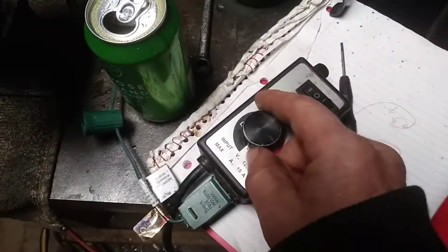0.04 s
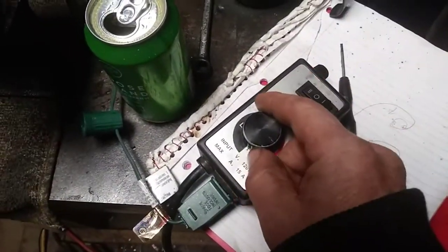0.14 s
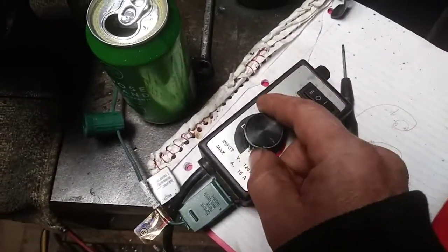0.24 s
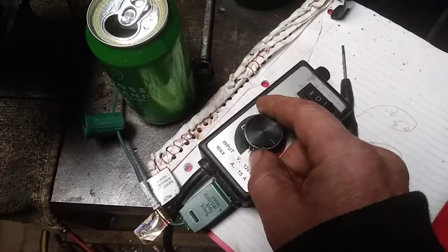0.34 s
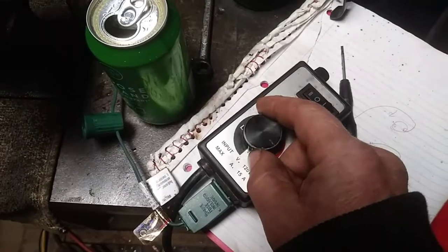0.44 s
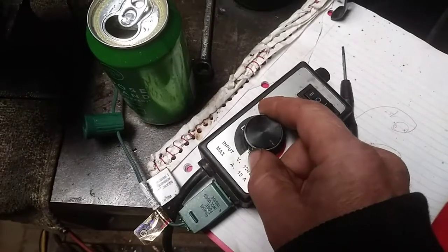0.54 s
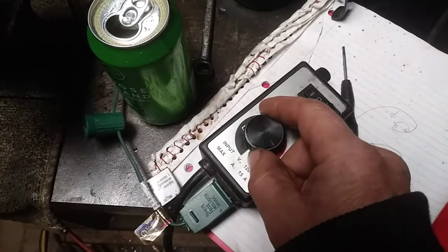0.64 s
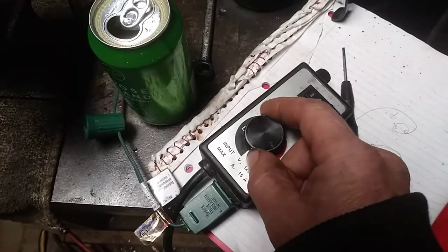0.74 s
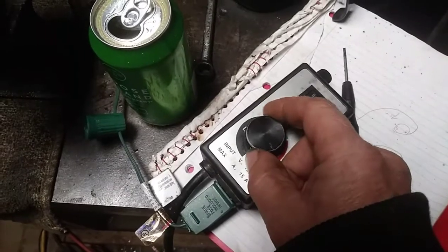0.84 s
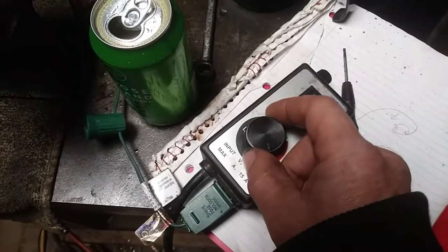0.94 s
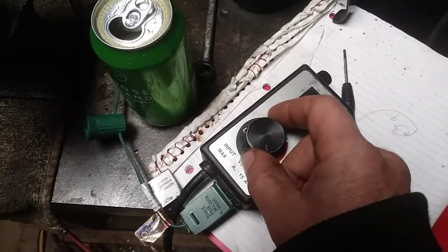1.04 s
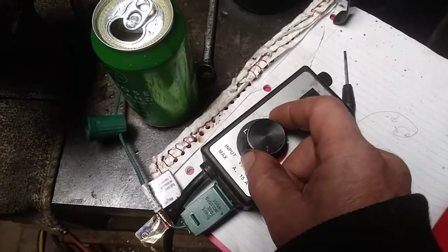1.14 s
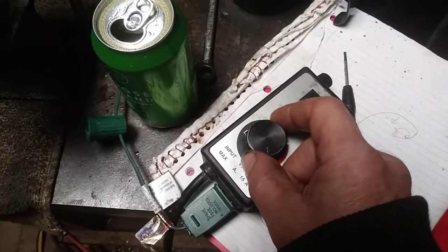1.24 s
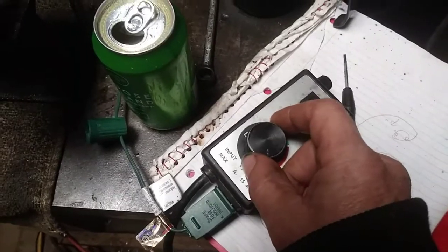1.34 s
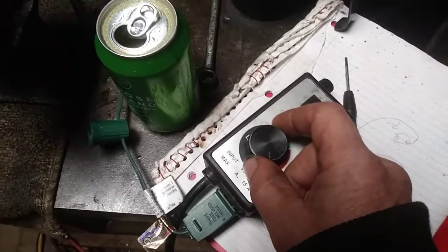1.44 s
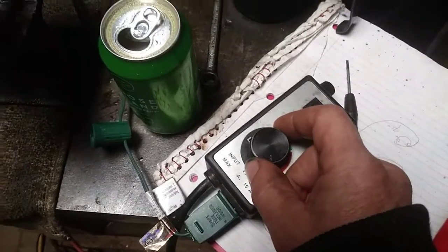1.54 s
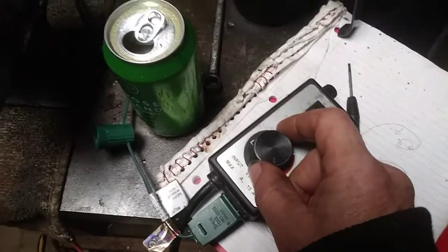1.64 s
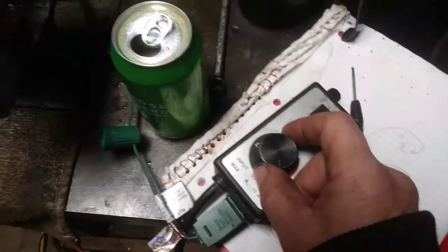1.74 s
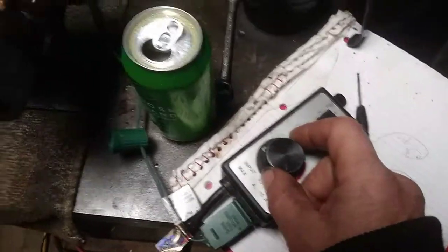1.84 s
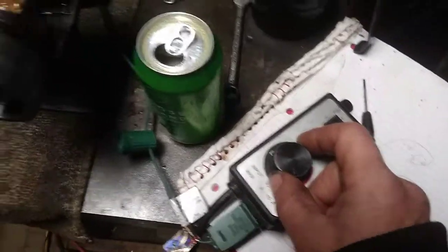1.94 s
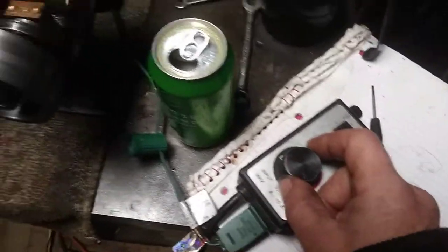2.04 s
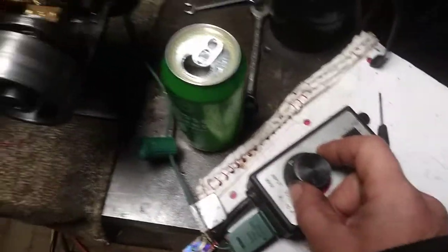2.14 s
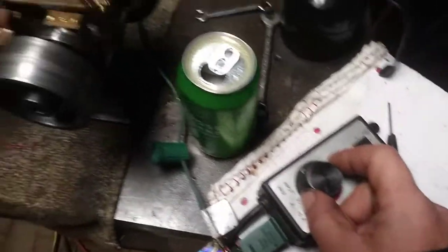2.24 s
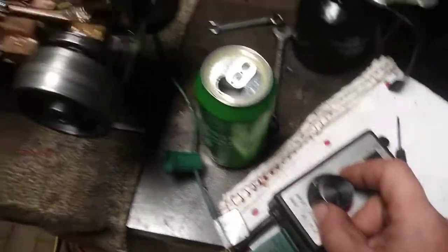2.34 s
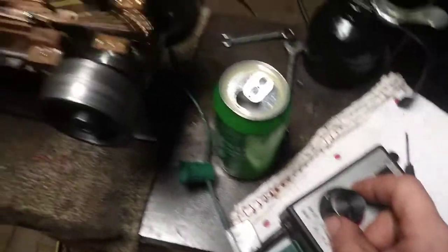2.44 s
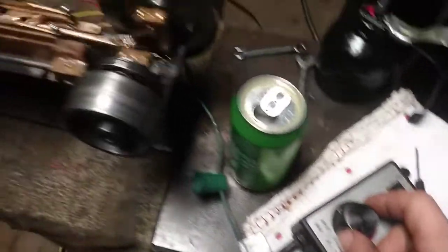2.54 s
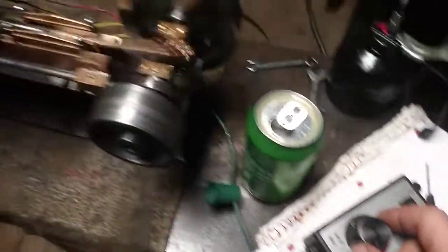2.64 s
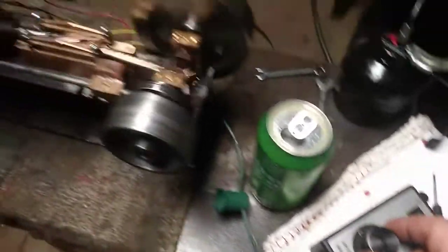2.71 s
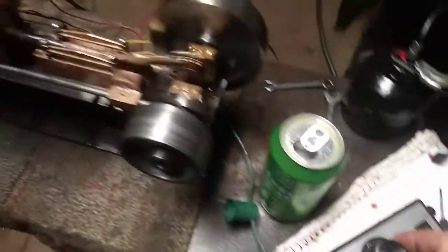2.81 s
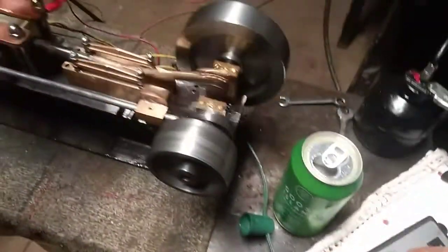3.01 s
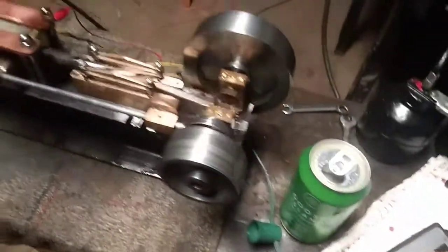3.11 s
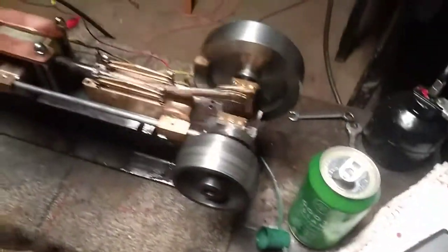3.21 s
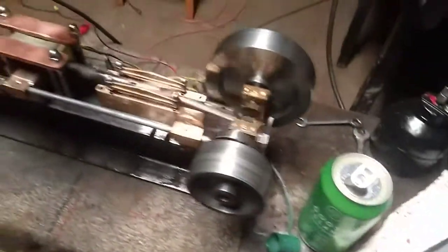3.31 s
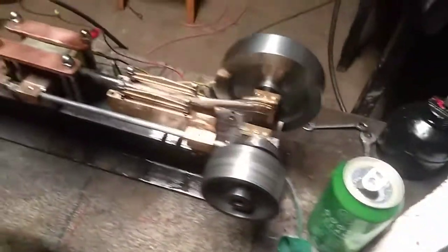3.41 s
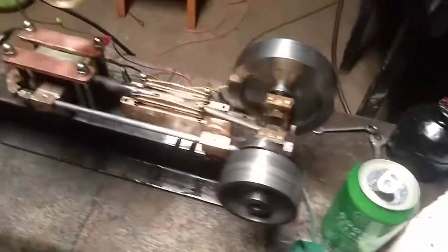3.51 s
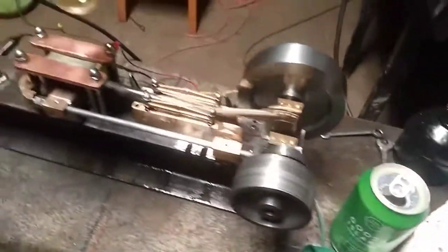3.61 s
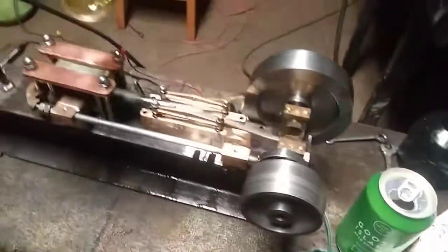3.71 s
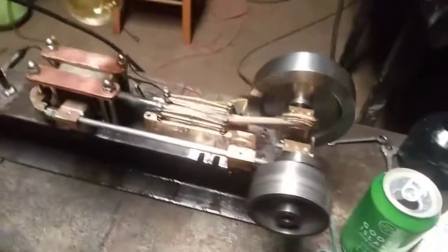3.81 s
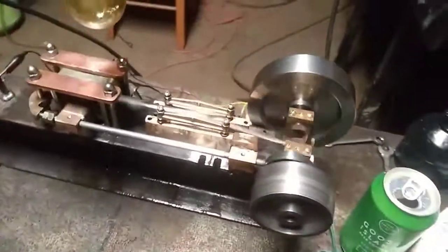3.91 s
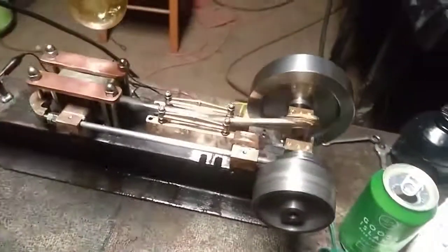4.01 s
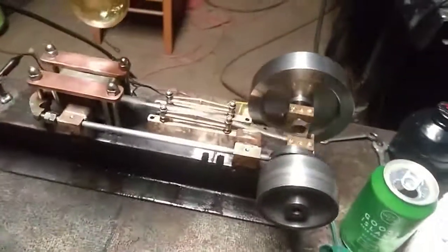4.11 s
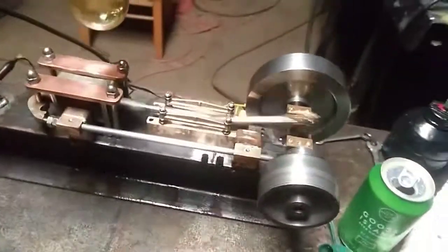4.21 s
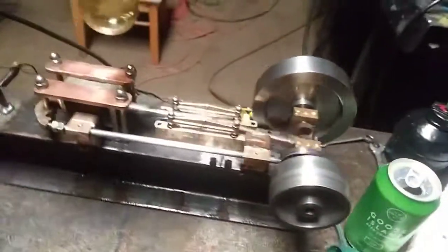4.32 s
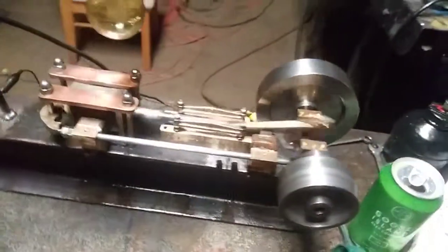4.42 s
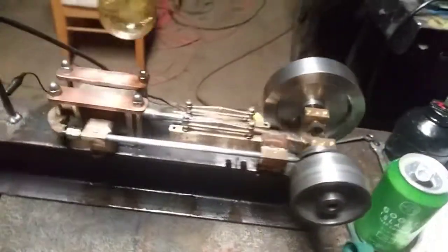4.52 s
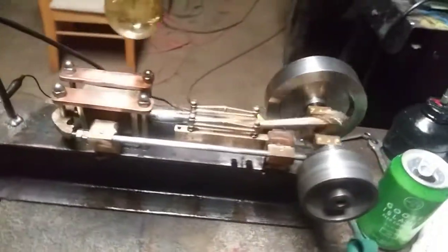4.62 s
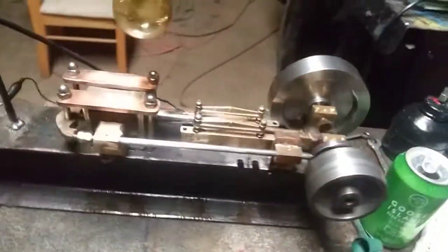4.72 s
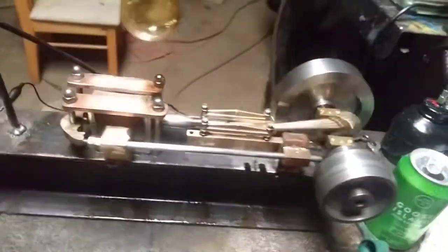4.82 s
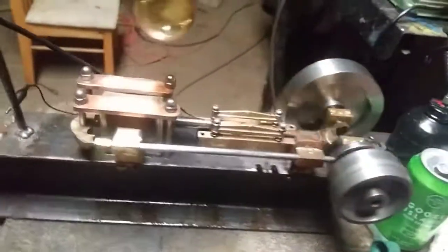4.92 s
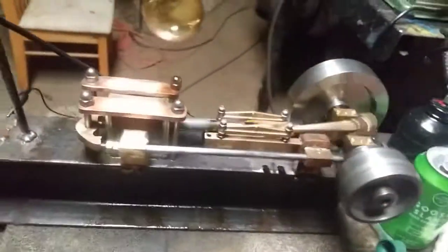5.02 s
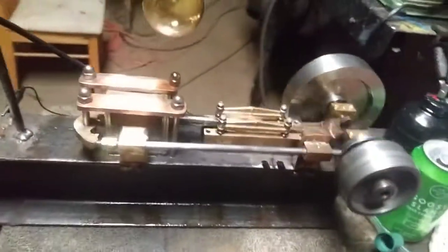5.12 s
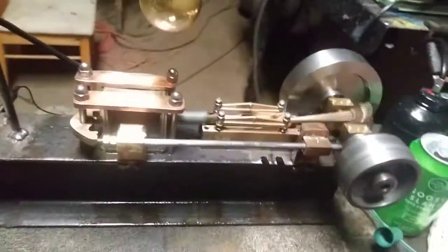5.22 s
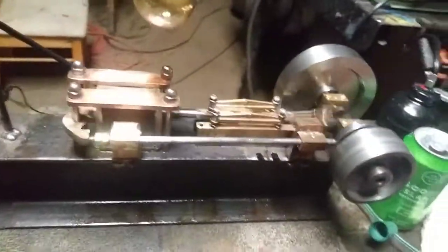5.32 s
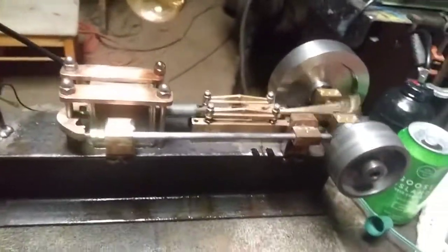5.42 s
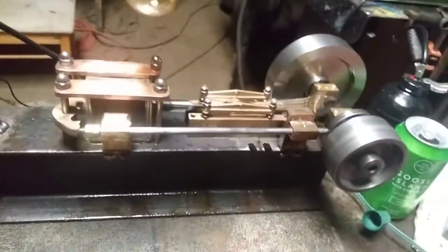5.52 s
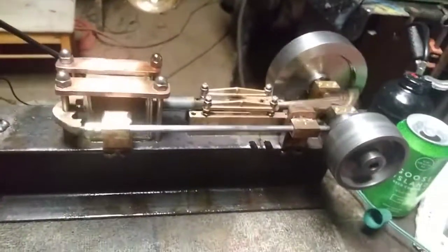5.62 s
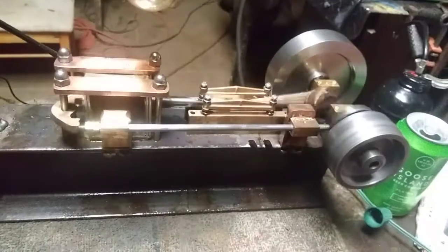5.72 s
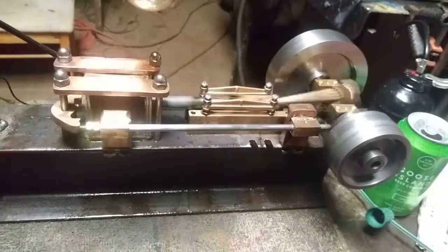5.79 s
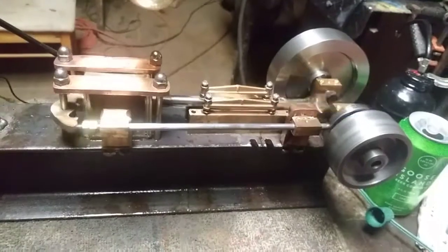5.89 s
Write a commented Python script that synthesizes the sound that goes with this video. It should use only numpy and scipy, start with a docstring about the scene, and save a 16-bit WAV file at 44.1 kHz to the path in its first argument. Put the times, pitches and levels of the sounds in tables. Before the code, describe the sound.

Steady bright metallic clacks, each with a light tick before and a duller rebound after, gradually speed up over faint hiss in a small workshop.

```python
"""On a workshop bench a small solenoid engine of steel and copper runs and gathers speed. Each turn gives a tick
as the linkage takes up its play, a bright clack as the plunger lands and a duller rebound. These contacts are
pushes and noise bursts through the resonances of one frame; a base, a thin rod and a link add their own notes.
A hand scuffs twice nearby in grainy noise, the workshop answers with decaying noise tails, and a low coloured
hiss lies beneath. One microphone gives both channels the same sound."""
import sys
import numpy as np
from scipy import signal
from scipy.fft import rfft, irfft, next_fast_len
from scipy.io import wavfile
from scipy.ndimage import uniform_filter1d

SR = 44100
rng = np.random.default_rng(int(sys.argv[2]) if len(sys.argv) > 2 else 0)


def unload_audio(sound):
    """Save the sound as a 16-bit wav file, at the path given as the first command line argument."""
    columns = np.transpose(np.atleast_2d(sound))
    # keep every value between -1 and 1, then stretch to whole-number steps
    steps = np.round(np.clip(columns, -1, 1) * 32767)
    wavfile.write(sys.argv[1], SR, steps.astype(np.int16))


N = 262395
LEAD = SR // 10  # samples played before the start, so that earlier blows still ring

EARLIER_S = -0.018  # a landing just before the start
# turns of the engine, the first landing just before the start; levels before each layer's own gain:
# (landing t/s, landing level/dB, rebound level/dB, rod ring re landing/dB, brightness re landing/dB)
TURNS = [(EARLIER_S, -31, -32, -28, 2), (0.2224, -33.5, -29, -30, 3.5), (0.4633, -31.5, -50, -30, 2.5),
         (0.7058, -29.5, -27, -20, 3), (0.9429, -29.5, -34, -23, 0.5), (1.1738, -29, -28, -27, 3),
         (1.3984, -30.5, -26.5, -27, 4.5), (1.619, -30.5, -36.5, -33, 2.5), (1.836, -26, -43, -32, -1.5),
         (2.0511, -26, -31, -24, 1.5), (2.2627, -27, -29, -35, 3.5), (2.472, -25, -22.5, -27, 2.5),
         (2.6787, -24.5, -45, -25, 5), (2.8846, -24.5, -35.5, -33, 1.5), (3.0874, -25.5, -29.5, -25, 2),
         (3.2901, -24.5, -23, -28, 2.5), (3.4905, -23, -23, -24, 0.5), (3.69, -23.5, -23, -27, 2),
         (3.8888, -22.5, -22, -36, -2), (4.0855, -22.5, -37, -35, -0.5), (4.2827, -23, -22.5, -32, 1),
         (4.4785, -23, -47.5, -28, -1), (4.6728, -23, -22.5, -35, -1.5), (4.8668, -21, -28.5, -27, -2),
         (5.0605, -21, -35, -31, -1), (5.2535, -22, -49, -19.5, -2), (5.446, -22.5, -41, -19, -4),
         (5.6372, -24, -50, -22.5, 0), (5.8285, -22.5, -38, -28, 2.5)]
# bright resonances of a hard contact: (f/Hz, width/Hz, relative level/dB)
SNAP = [(7480, 3600, -22.5), (10100, 3600, -7.5), (11250, 370, -1.5), (13020, 1200, 0), (15500, 2300, -6.5)]


def amp(db):
    """Gain of a level in dB."""
    return 10 ** (np.asarray(db) / 20)


def unit(x):
    """x at rms 1."""
    return x / np.sqrt(np.mean(x ** 2) + 1e-20)


def along(points, hz):
    """Values at hz, read from (f/Hz, value) points on a log frequency axis."""
    f, v = np.transpose(points)
    return np.interp(np.log(hz + 1), np.log(f + 1), v)


def filtered(x, response):
    """x times a complex response of frequency, padded so that rings do not wrap round."""
    n = x.shape[-1]
    m = next_fast_len(n + SR // 2)
    hz = np.fft.rfftfreq(m, 1 / SR)
    return irfft(rfft(x, m) * response(hz), m)[..., :n]


def noise(spectrum):
    """Noise of rms 1 coloured by a (f/Hz, level/dB) curve."""
    white = rng.standard_normal(N)
    return unit(filtered(white, lambda hz: amp(along(spectrum, hz))))


def ringing(force, modes):
    """A force through parallel (f/Hz, width/Hz, level/dB) resonances of alternating sign."""
    def response(f):
        total = 0
        for k, (centre, width, db) in enumerate(modes):
            damping = 1j * f * width
            total = total + (-1) ** k * amp(db) * damping / (centre ** 2 - f ** 2 + damping)
        return total
    return filtered(force, response)


def soft(x, top_hz):
    """A yielding contact carries little treble: two gentle low-pass stages."""
    return filtered(x, lambda hz: 1 / (1 + 1j * hz / top_hz) ** 2)


def pushes(times, db):
    """One clean push for each contact; row 0 is heard directly, row 1 fills the room."""
    force = np.zeros((2, LEAD + N))
    force[:, LEAD + np.round(times * SR).astype(int)] = amp(db)
    return force


def blows(times, db, chatter_s, first_db, rise_s=1e-5):
    """A first touch, then micro-impacts that die 60 dB in chatter_s; the room's many paths average them to a push."""
    t = np.arange(SR // 20) / SR
    decay = amp(-60 * t / np.reshape(chatter_s, (-1, 1)))
    bursts = rng.standard_normal((len(times), len(t))) * decay
    bursts *= 1 - np.exp(-t / rise_s)
    bursts /= np.linalg.norm(bursts, axis=1, keepdims=True)
    force = pushes(times, db) * [[amp(first_db)], [1]]
    for s, level, burst in zip(times, db, bursts):
        spot = force[0, LEAD + round(s * SR):][:len(t)]
        spot += amp(level) * burst[:len(spot)]
    return force


def frame(axis):
    """The frame's resonances as one kind of contact drives them (column 2 tick, 3 clack, 4 rebound)."""
    # resonances of the frame: (f/Hz, width/Hz, tick level/dB, clack level/dB, rebound level/dB)
    frame_modes = [(315, 230, -22, -17.5, -18), (660, 219, -9.5, -10, -5.5), (1560, 346, 0, -7, -6),
                   (1950, 218, 6, -0.5, -2.5), (2192, 250, 4.5, 3, 2), (2614, 720, -4.5, -6.5, -2.5),
                   (3354, 440, -4, -5.5, -1.5), (3710, 180, 3.5, -1, -1.5), (4340, 550, -8.5, -1, -2),
                   (4914, 830, -9.5, -1, -18.5), (5960, 1230, -17.5, -6, 0)]
    return [(row[0], row[1], row[axis]) for row in frame_modes]


def base(times, db):
    """The blow reaches the heavy base through its mounts, so the note swells for a few ms."""
    # note of the steel base: (f/Hz, width/Hz)
    base_note = (1068.3, 101)
    through_mounts = ringing(pushes(times, db), [(base_note[0], 260, 0)])
    return ringing(through_mounts, [(*base_note, 0)])


def swing(times):
    """Levels at these times: the balance shifts as the microphone swings round to the engine."""
    # balance before each layer's own gain; all but the tick level are relative to their contact:
    # (t/s, tick level/dB, tick brightness/dB, base knock/dB, link slap/dB)
    balance = [(0.2, -37.5, -18, 1, -21), (1.5, -34.5, -20, 3.5, -22), (1.95, -33.5, -19, -2.5, -23),
               (2.65, -32.5, -21, 1, -19), (3.1, -26.5, -15, 0.5, -14), (3.8, -24, -15, -2.5, -15),
               (4.3, -21.5, -14.5, -3.5, -17), (5.1, -23, -13.5, -6, -21), (5.5, -21.5, -20, -2.5, -14),
               (5.85, -21, -23, -3.5, -14)]
    s, *cols = np.transpose(balance)
    return [np.interp(times, s, col) for col in cols]


def hiss():
    """A steady bed of coloured noise whose level drifts."""
    # colour of the hiss: (f/Hz, relative level per Hz/dB)
    hiss_colour = [(15, -56), (25, -12), (76, -27.5), (229, -5), (840, -5.5), (1040, -4), (1480, -11.5),
                   (2160, -10), (3720, -15.5), (7600, -25.5), (11000, -22), (13600, -22), (15800, -24),
                   (16100, -48)]
    # drift of the hiss: (t/s, rms level/dB)
    hiss_drift = [(0, -66.5), (2.8, -65), (3.9, -71), (5.95, -62)]
    level_db = np.interp(np.arange(N) / SR, *np.transpose(hiss_drift))
    return amp(level_db) * noise(hiss_colour)


def shop(x, count):
    """The room's tail, each frequency dying at its own speed; each stretch of time gets a freshly drawn noise tail."""
    # decay of the workshop: (f/Hz, time to fall 60 dB/s)
    shop_decay = [(300, 1), (1000, 0.34), (2500, 0.41), (6000, 0.26), (14000, 0.19)]
    wet = np.zeros(len(x) + SR)
    step = len(x) // count + 1
    for start in range(0, len(x), step):
        hz, t, grains = signal.stft(rng.standard_normal(SR // 2), SR, nperseg=256)
        clutter = amp(-60 * t / 0.027)  # short answer of things on the bench
        walls = amp(-9 - 60 * t / along(shop_decay, hz)[:, None])
        tail = signal.istft(grains * (clutter + walls), SR, nperseg=256)[1]
        answer = signal.fftconvolve(x[start:start + step], tail / np.linalg.norm(tail))
        wet[start + 100:][:len(answer)] += answer  # 100 samples of delay
    return wet[:len(x)]


def scuffs():
    """Brief grainy rubbing that swells, holds and fades."""
    # strokes of the hand: (full swell t/s, level/dB, rise/s, hold/s, fall/s), rise and fall by a factor e
    strokes = [(0.053, -46.5, .012, .008, 0.0075), (1.049, -53, 0.003, .016, 0.009)]
    # colour of the rubbing: (f/Hz, relative level per Hz/dB)
    rub_colour = [(180, -39), (300, -11.5), (2280, -4), (3030, -5), (5700, -9.5), (6740, -14),
                  (9880, -13.5), (16000, -26)]
    t = np.arange(N) / SR
    swell = np.zeros(N)
    for s, db, rise, hold, fall in strokes:
        slope = np.minimum((t - s) / rise, (s + hold - t) / fall)
        swell += amp(db) * np.exp(np.minimum(slope, 0))
    roughness = unit(uniform_filter1d(rng.standard_normal(N), size=40))
    grain = amp(2.8 * roughness)
    return swell * unit(grain * noise(rub_colour))


def rattle(count):
    """Loose parts touch a few more times at random while the frame settles."""
    s, db = np.transpose(TURNS)[:2, :, None]
    wait, size = rng.random((len(TURNS), 2, count)).transpose(1, 0, 2)
    after_s = .015 + .07 * wait
    level_db = db + 5 - 190 * after_s + 8 * size  # later touches are weaker
    touches = blows((s + after_s).ravel(), level_db.ravel(), 0.0091, first_db=-4.5)
    return soft(ringing(touches, frame(axis=4)), top_hz=4400)


def rebounds():
    """A soft second landing, which follows after a fixed time and a share of the turn."""
    s, _, db = np.transpose(TURNS)[:3]
    lag_s, lag_share = .016, .043
    s = s + lag_s + lag_share * np.gradient(s)
    body = ringing(blows(s, db + 21, 0.014, first_db=-7, rise_s=.0004), frame(axis=4))
    return soft(body, top_hz=3700) + base(s, db + 16.5)


def ticks():
    """Mostly the frame's middle modes: a faint noisy lead-in 4 ms early, the touch, the pin settling 9 ms later."""
    s = np.transpose(TURNS)[0] - .0263  # seconds ahead of the landing
    db, bright_db = swing(s)[:2]
    modes = frame(axis=2)
    lower, upper = modes[:6], modes[6:]
    first_db, lead_in_s, settle_s = 3, s - .004, s + .009
    body = ringing(blows(s + .0006, db + 15.7, 0.027, first_db), lower)
    touch = blows(s, db + 20.5, 0.029, first_db)
    settling = blows(settle_s, db + 4, 0.007, first_db=-1)
    lead_in = blows(lead_in_s, db + 6.5, 0.064, first_db=-22)
    body += ringing(touch + settling + lead_in, upper)
    snap = ringing(blows(s, db + bright_db + 16, .015, first_db=-13), SNAP)
    return body + snap + base(s, db + 13)


def clacks():
    """The plunger lands, the hardest contact; a link slaps after it and the rod sings on."""
    # a thin rod that sings on: (f/Hz, width/Hz)
    rod_note = (7140, 28)
    s, db, _, rod_db, bright_db = np.transpose(TURNS)
    knock_db, slap_db = swing(s)[2:]
    longer, harder = rng.standard_normal((len(s), 2)).T
    chatter_s = .015 * np.exp(.2 * longer)  # each landing chatters for its own time
    slap_db = slap_db + 3 * harder
    rise_s = .0004  # the chatter swells this fast

    # each landing favours other modes of the frame
    modes = frame(axis=3)
    favour_db = 1.5 * rng.standard_normal((len(s), 3)).T
    body = 0
    for more_db, part in zip(favour_db, (modes[:4], modes[4:8], modes[8:])):
        landing = blows(s, db + 21.5 + more_db, 1.2 * chatter_s, first_db=-3, rise_s=rise_s)
        body = body + ringing(landing, part)

    crack = blows(s, db + bright_db + 19, 0.58 * chatter_s, first_db=-6, rise_s=rise_s)
    trail = blows(s, db + bright_db + 7, 0.03, first_db=-30)
    snap = ringing(crack + trail, SNAP) * amp([[0], [-2.5]])  # less of it fills the room

    knock = base(s + .002, db + knock_db + 32.5)
    skirt = blows(s, db + knock_db + 20.5, .035, first_db=-14)
    knock += ringing(skirt, [(1292, 250, 0)])  # the base's broad upper skirt

    rod = ringing(pushes(s, db + rod_db + 50), [(*rod_note, 0)]) * [[1], [.3]]
    slap = ringing(pushes(s + .0135, db + slap_db + 32), [(3730, 220, 0)]) * [[1], [.4]]
    return body + snap + knock + rod + slap


def scene():
    """Engine and hand, their echo and the hiss, alike in both channels."""
    hand = np.pad(scuffs(), (LEAD, 0))
    near, sent = rattle(count=9) + rebounds() + ticks() + clacks() + hand
    heard = near + amp(-4) * shop(sent, count=30)
    return np.tile(heard[LEAD:] + hiss(), (2, 1))


def record(dry):
    """The microphone drops the bass and fades at the very top; nothing is kept above the band limit."""
    # response of the microphone: (f/Hz, level/dB)
    mic_curve = [(40, -3), (200, 3), (15850, 0.5), (16100, -14)]
    top_hz = 16900
    return filtered(dry, lambda hz: amp(along(mic_curve, hz)) * (hz < top_hz))


dry = scene()
out = record(dry)
unload_audio(out)
```